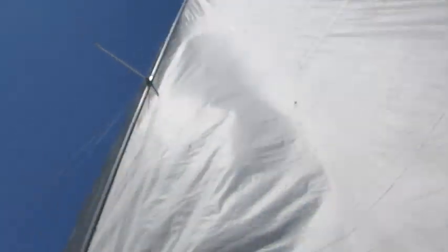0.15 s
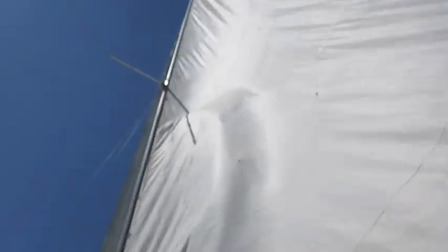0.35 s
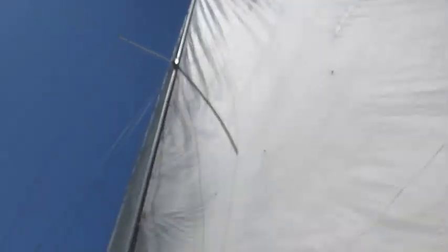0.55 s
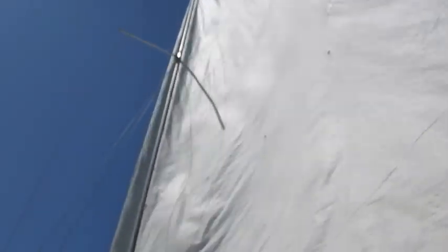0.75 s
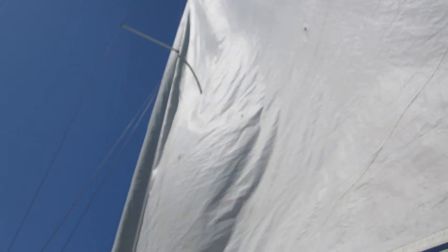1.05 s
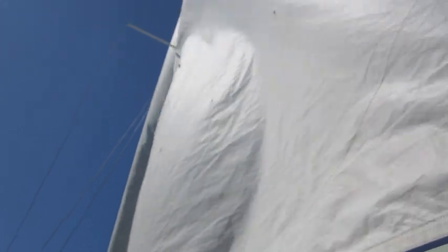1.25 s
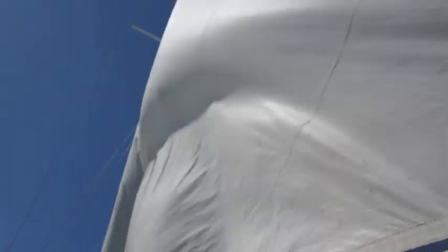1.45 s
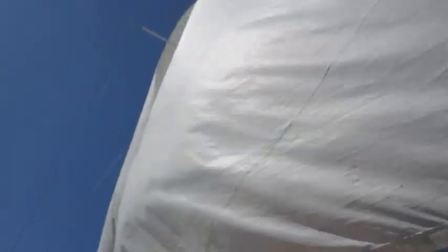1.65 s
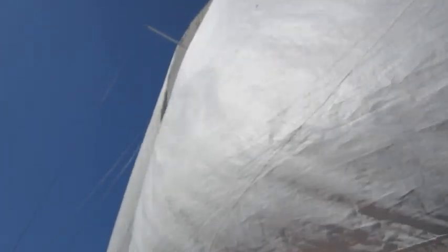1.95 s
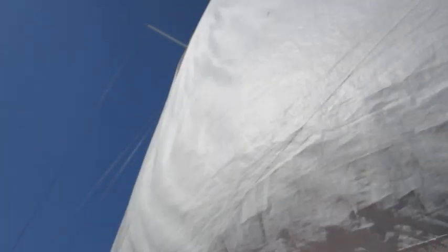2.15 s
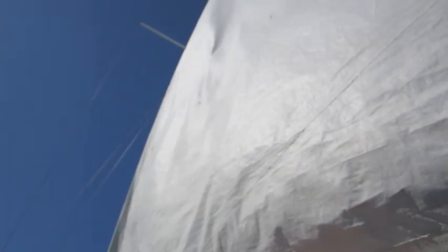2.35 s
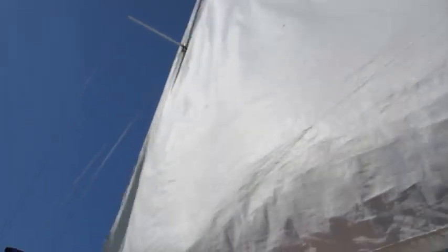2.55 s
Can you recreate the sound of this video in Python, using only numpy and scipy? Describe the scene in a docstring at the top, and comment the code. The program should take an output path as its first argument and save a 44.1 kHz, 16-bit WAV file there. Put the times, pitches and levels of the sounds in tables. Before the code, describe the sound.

Loose sailcloth cracks and rustles in two irregular surges, with faint short metal rings from rigging and tiny squeaks. Low gusts bump the unprotected microphone; afterward only faint cloth ticks and distant sea remain.

```python
"""A slack sail flaps on a small boat in light wind: slaps and crackles, faint metal ringing, rustle between.
Slaps are bursts of clumped, filtered grains that also strike resonators, the metal modes of the rigging.
Rustle is flickering coloured grains; the air buffets the microphone as lumpy low noise and short swings.
Fittings squeak as wavering tones with weak harmonics; the sea far below is steady coloured noise."""
import sys
import numpy as np
from scipy import signal
from scipy.fft import rfft, irfft
from scipy.io import wavfile
from scipy.ndimage import uniform_filter1d

SR = 44100
rng = np.random.default_rng(int(sys.argv[2]) if len(sys.argv) > 2 else 0)


def digitize_waveform(pressure):
    """Quantize a signal to 16-bit integers and store it at the path in sys.argv[1].

    Rows of a 2-D input are taken as channels; values are limited to [-1, 1].
    """
    field = np.atleast_2d(pressure).T
    bounded = np.clip(field, -1, 1)
    quanta = np.round(bounded * 32767).astype(np.int16)
    wavfile.write(sys.argv[1], SR, quanta)


N = 119070


def amp(db):
    """Gain of a level in dB."""
    return 10 ** (np.asarray(db) / 20)


def unit(x):
    """Scales x to rms 1 along its last axis."""
    return x / np.sqrt(np.mean(x ** 2, axis=-1, keepdims=True) + 1e-20)


def in_time(rows):
    """Interpolates the columns of a table over its first column, t/s."""
    s, *columns = np.transpose(rows)
    t = np.arange(N) / SR
    return [np.interp(t, s, column) for column in columns]


def band(x, low_hz, high_hz):
    """Butterworth band-pass."""
    sos = signal.butter(2, [low_hz, high_hz], "band", fs=SR, output="sos")
    return signal.sosfilt(sos, x)


def drift(corner_hz):
    """Slow random curve of rms 1: noise through two equal low-pass poles."""
    r = np.exp(-2 * np.pi * corner_hz / SR)
    noise = rng.standard_normal(N + SR)
    return unit(signal.lfilter([1], [1, -2 * r, r * r], noise)[SR:])   # first second: filter settling


def grains(shape, spread_db):
    """Dense clicks of uneven size and sign, rms 1."""
    excess_db = spread_db * np.minimum(rng.exponential(1, shape), 6)
    return unit(amp(excess_db) * rng.standard_normal(shape))


def coloured(x, spectrum):
    """Shapes x by a spectrum interpolated in dB over log frequency; rms 1."""
    hz = np.maximum(np.fft.rfftfreq(len(x), 1 / SR), 1)
    point_hz, point_db = np.transpose(spectrum)
    gain_db = np.interp(np.log(hz), np.log(point_hz), point_db)
    return unit(irfft(rfft(x) * amp(gain_db), len(x)))


def wind():
    """Lumpy low pressure on the microphone, plus buffets: brief swings under a Gaussian envelope."""
    # pressure noise: t/s, low part/dB, upper part/dB
    pressure = [(0, -54.5, -50), (0.2, -41.5, -41), (0.27, -22.5, -34.5), (0.33, -33.5, -40),
                (0.38, -21.5, -36.5), (0.46, -24.5, -35), (0.52, -25.5, -20), (0.62, -26, -22.5),
                (0.7, -36, -27), (0.8, -24, -36.5), (0.83, -29.5, -40), (0.89, -26.5, -35),
                (0.98, -18, -30.5), (1.03, -41.5, -67), (1.08, -29.5, -33.5), (1.12, -34, -69),
                (1.19, -24.5, -26.5), (1.24, -37.5, -42), (1.38, -40.5, -43.5), (1.41, -32, -35),
                (1.46, -38, -40.5), (1.56, -27.5, -28.5), (1.67, -31.5, -26.5), (1.72, -48, -47.5),
                (1.9, -72, -55.5), (2.2, -63, -69), (2.31, -58, -60), (2.34, -38, -55), (2.42, -36, -33),
                (2.5, -46.5, -75), (2.6, -51, -46), (2.7, -50, -48.5)]
    # strongest buffets: t/s, peak/dB, f/Hz
    buffets = [(0.36, -12.5, 178), (0.396, -9, 199), (0.568, -17.5, 147), (0.573, -4, 317),
               (0.629, -6.5, 240), (0.657, -14.5, 401), (0.696, -12.5, 199), (0.738, -11, 282),
               (0.798, -16, 365), (0.880, -13, 162), (0.892, -14.5, 148), (0.908, -16.5, 146),
               (0.930, -19, 151), (0.943, -12.5, 214), (0.95, -11.5, 151), (0.969, -11, 203),
               (0.992, -15, 157), (1.064, -19, 227), (1.087, -14, 283), (1.159, -24, 127), (1.18, -11, 140),
               (1.192, -20, 202), (1.205, -14, 220), (1.402, -24, 163), (1.552, -9.5, 258),
               (2.25, -32, 157), (2.332, -27, 182.3), (2.366, -26, 170), (2.394, -21.5, 300),
               (2.397, -17, 317), (2.427, -27, 145)]
    low_hz, knee_hz, upper_hz = 33, 139, 385
    lump_db, lump_corner_hz, buffet_cycles = 3, 72, 0.39

    level_db, upper_db = in_time(pressure)
    lumpiness = np.clip((level_db + 30) / 15, 0, 1)   # calm air is smooth
    lumps_db = lump_db * drift(lump_corner_hz) * lumpiness
    low = unit(band(rng.standard_normal(N), low_hz, knee_hz))
    upper = unit(band(band(rng.standard_normal(N), 83, upper_hz), 85, 410))
    out = amp(level_db + 0.58 * lumps_db) * low + amp(upper_db + lumps_db) * upper

    t = np.arange(N) / SR
    phases = rng.uniform(0, 2 * np.pi, len(buffets))
    for (s, db, hz), phase in zip(buffets, phases):
        turns = (t - s) * hz - .3
        envelope = np.exp(-(turns / buffet_cycles) ** 2)
        out += amp(db) * envelope * np.cos(2 * np.pi * turns + phase)
    return out


def rustle():
    """Fine crinkling of the cloth: crisp and dull filterings of the same grains, flickering together."""
    # levels: t/s, crisp/dB, dull/dB
    levels = [(0, -49.5, -52), (0.13, -46.5, -48.5), (0.3, -34.5, -38.5), (0.5, -36.5, -40),
              (0.65, -29.5, -37), (0.74, -40.5, -41.5), (0.83, -47.5, -56), (1.03, -54.5, -53.5),
              (1.2, -55, -55.5), (1.36, -45.5, -48), (1.43, -41, -39.5), (1.53, -34, -31),
              (1.69, -27.5, -44.5), (1.73, -54, -56), (1.9, -72, -72), (2.15, -70, -71), (2.5, -62, -64.5),
              (2.7, -56, -56)]
    # crisp spectrum: f/Hz, level/dB per Hz
    crisp_colour = [(760, -31), (1300, -20), (1940, 4.5), (2220, -3.5), (2830, 3), (3760, -5),
                    (11200, -20.5), (16000, -35.5)]
    grain_db, flicker_db, flicker_corner_hz = 2, 3, 34

    crisp_db, dull_db = in_time(levels)
    x = grains(N, grain_db)
    crisp = amp(crisp_db) * coloured(x, crisp_colour)
    dull = amp(dull_db) * unit(band(x, 410, 1500))
    return amp(flicker_db * drift(flicker_corner_hz)) * (crisp + dull)


def sea():
    """Steady hiss of the sea far below: coloured noise."""
    # spectrum: f/Hz, level/dB
    sea_colour = [(30, 20.5), (98, 6.5), (204, -13), (394, 9), (616, -25), (1070, -2), (1590, -20.5),
                  (9710, -30.5), (16000, -47.5)]
    sea_db = -55
    return amp(sea_db) * coloured(rng.standard_normal(N), sea_colour)


def clumped(x):
    """Third-octave slices of x swell and drop each on its own, so short clumps differ in pitch."""
    clump_db, clump_s = 2.5, 0.003
    edges_hz = 500 * 2 ** (np.arange(15) / 3)
    rows, size = x.shape
    step = int(clump_s * SR)
    out = 0
    for low_hz, high_hz in zip(edges_hz, edges_hz[1:]):
        knots = rng.standard_normal((rows, size // step + 1))
        smooth = uniform_filter1d(np.repeat(knots, step, axis=1), size=step)[:, :size]
        out = out + band(x, low_hz, high_hz) * amp(clump_db * smooth)
    return unit(out)


def rigging(strikes, modes):
    """Each metal mode is a two-pole resonator rung by its row of strikes."""
    out = np.zeros(N)
    for (hz, db, t60), clicks in zip(modes, strikes):
        r, w = amp(-60 / (t60 * SR)), 2 * np.pi * hz / SR
        poles = [1, -2 * r * np.cos(w), r * r]
        out += amp(db) * signal.lfilter([0, np.sin(w)], poles, clicks + 1e-18)   # offset avoids denormals
    return out


def slaps():
    """Each slap is a snap and a dying burst of crackle, and it strikes the rigging's modes."""
    # cloth slaps: t/s, nominal peak/dB, crackle centre f/Hz, dull/dB re peak, treble/dB re peak, t60/s
    cloth_slaps = [(0.0255, -23, 2040, -14.5, -26, 0.071), (0.0582, -18, 3770, -42, -26, 0.071),
                   (0.1533, -11, 2780, -10, -18, 0.024), (0.194, -13, 2870, -22, -29, 0.052),
                   (0.255, -20, 5100, -30, -27.5, 0.083), (0.312, -13, 4730, -49, -44, 0.077),
                   (0.3217, -5, 3500, -26, -35, 0.042), (0.3416, -7, 4020, -39, -17.5, 0.064),
                   (0.3773, -23, 3080, -23, -9, 0.32), (0.3997, -20, 4350, -16, -23, 0.24),
                   (0.4393, -9.5, 4450, -49, -10, 0.17), (0.5162, -11.5, 3140, -21, -17, 0.12),
                   (0.5573, -9, 3600, -9.5, -17, 0.079), (0.593, -12, 4350, -10.5, -5, 0.057),
                   (0.625, -20.5, 2940, -10, -24, 0.38), (0.655, -1, 2670, -2.5, -50, 0.032),
                   (0.6731, -21.5, 2820, -44, 0, 0.27), (0.6867, -9, 3800, -45, -33, 0.14),
                   (0.7004, -10.5, 3670, -20, -6, 0.07), (0.751, -14.5, 4570, -38, -16.5, 0.1),
                   (0.7866, -15.5, 4200, -26.5, -15, 0.11), (0.9192, -32, 1100, -9, -31, 0.094),
                   (0.9513, -19.5, 3850, -44, -33, 0.1), (0.965, -18, 4370, -45, -21.5, 0.065),
                   (1.0028, -32.5, 1310, -5, -23, 0.038), (1.056, -21.5, 3540, -12, -64, 0.1),
                   (1.2238, -32.5, 2100, -5, -22.5, 0.51), (1.2354, -28.5, 3850, -20, -25, 0.27),
                   (1.3198, -26, 2860, 3, -40, 0.04), (1.3901, -30.5, 1560, 0, -3, 0.042),
                   (1.4392, -17, 2920, -19.5, -28.5, 0.24), (1.4683, -20, 3480, -13.5, -12, 0.1),
                   (1.5446, -6, 2780, -14, -29.5, 0.052), (1.552, -7, 3160, -13.5, -10, 0.1),
                   (1.599, -17, 3360, -23.5, -13, 0.34), (1.6107, -11.5, 4800, -10.5, -9.5, 0.19),
                   (1.6291, -5, 4840, -21.5, -5.5, 0.07), (1.6523, -9.5, 5860, -17, -13, 0.15),
                   (1.659, -6, 3770, -28, -17, 0.057), (1.6673, -4, 3600, -40, -8, 0.083),
                   (1.7428, -27.5, 2710, -22, -37.5, 0.06), (1.750, -25, 3600, -28, -8, 0.083),
                   (1.819, -36, 2986, -12, -24.5, 0.19), (1.830, -25, 3800, -28.5, -20.5, 0.053),
                   (2.0898, -39.5, 4160, -17, -11.5, 0.12), (2.1799, -45.5, 3980, -18, -22.5, 0.094),
                   (2.2148, -48.5, 1660, -2, -23, 0.052), (2.2853, -37, 2494, -2.5, -14, 0.079),
                   (2.3341, -38.5, 1515, -19, -31, 0.11), (2.353, -31.5, 2500, -11.5, -28, 0.052),
                   (2.4186, -44.5, 3970, -1.5, -27, 0.27), (2.4374, -43.5, 3550, -15, -12, 0.12),
                   (2.6141, -41.5, 2780, -16.5, -16, 0.31), (2.6864, -41.5, 1730, -4, -13.5, 0.19)]
    # metal modes: f/Hz, level/dB, t60/s
    modes = [(2765, -42, 0.15), (4010, -41, .11)]
    attack_s, crest_db, crackle_q, grain_db = 0.0023, -15.5, 1.67, 2.5   # crest: rms re peak
    broad_db, treble_t60_share = -2, 0.53   # broad part re crackle; treble t60 re slap t60
    snap_db, snap_t60_s = 0.5, 0.017   # the first crack stands out of the burst
    ring_follows = 0.55   # big slaps are mostly cloth: ring dB per slap dB
    miss_db_per_octave, strike_spread_db = 25, 2   # ring loss by distance of slap colour from mode

    size = SR // 4
    t = np.arange(size) / SR
    out = np.zeros(N + size)
    strikes = np.zeros((len(modes), N))

    crackle = clumped(grains((len(cloth_slaps), size), grain_db))
    dull = unit(band(crackle, 540, 1000))
    broad = amp(broad_db) * unit(band(band(crackle, 1300, 5700), 800, 8500))
    treble = unit(band(crackle, 2900, 9100))
    spread = 1 + 1 / crackle_q / 2
    start = 1 - np.exp(-t / attack_s)
    snap = 1 + amp(snap_db - 60 * t / snap_t60_s)

    octaves = np.log2(np.array(cloth_slaps)[:, 2:3] / np.array(modes)[:, 0])
    miss_db = miss_db_per_octave * np.abs(octaves)
    chance_db = rng.normal(0, strike_spread_db, miss_db.shape)
    for k, (s, db, hz, dull_db, treble_db, t60) in enumerate(cloth_slaps):
        i = int(s * SR)
        fade_db = -60 * t / t60
        centre = unit(band(crackle[k], hz / spread, hz * spread))
        body = centre + broad[k] + amp(dull_db - crest_db) * dull[k]
        top = amp(treble_db - crest_db + fade_db / treble_t60_share) * treble[k]
        out[i:i + size] += amp(db + crest_db) * start * snap * (body * amp(fade_db) + top)
        strikes[:, i] += amp(ring_follows * db + chance_db[k] - miss_db[k])
    return out[:N] + rigging(strikes, modes)


def squeak():
    """Fittings squeak: short tones of wavering level that swell and fade, with weak 2nd and 3rd harmonics."""
    # squeaks: t/s, length/s, start f/Hz, rise/(Hz/s), level/dB
    squeaks = [(.825, 0.029, 4000, 0, -45), (1.25, 0.055, 552.5, 0, -36), (1.335, 0.05, 2780, 2900, -40),
               (2.2, 0.07, 1131, 306.5, -60), (2.383, 0.05, 1150, 500, -55)]
    waver_db, waver_corner_hz, harmonics_db = 2.0, 80, -18

    t = np.arange(N) / SR
    out = np.zeros(N)
    for s, length, hz, rise, db in squeaks:
        age = t - s
        swell = np.sin(np.pi * np.clip(age / length, 0, 1))
        phase = 2 * np.pi * (hz + rise * age / 2) * age
        harmonics = np.sin(2 * phase) + np.sin(3 * phase)
        out += amp(db) * swell * (np.sin(phase) + amp(harmonics_db) * harmonics)
    return amp(waver_db * drift(waver_corner_hz)) * out


def scene():
    """Sum of all sources, one channel."""
    return (wind() + rustle() + sea() + slaps() + squeak())[None]


def record(dry):
    """Steep low-pass cuts the top."""
    cutoff_hz = 16450
    return signal.sosfilt(signal.cheby2(14, 70, cutoff_hz, fs=SR, output="sos"), dry)


dry = scene()
out = record(dry)
digitize_waveform(out)
```